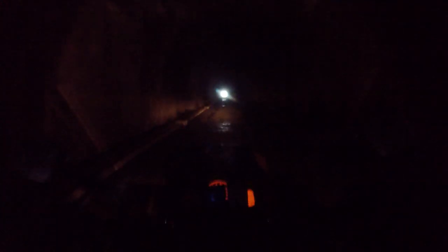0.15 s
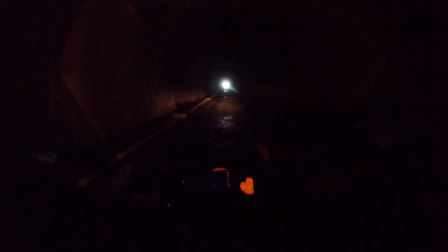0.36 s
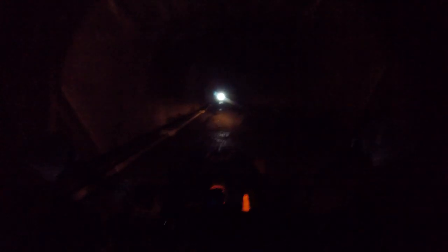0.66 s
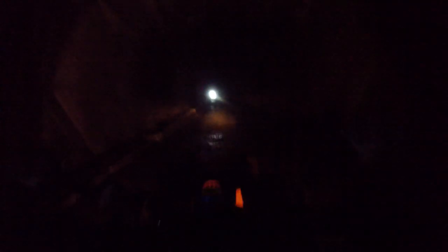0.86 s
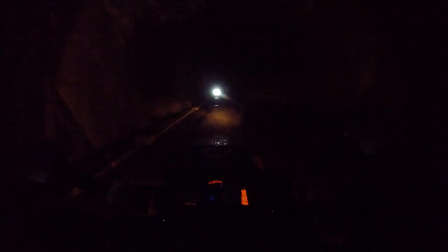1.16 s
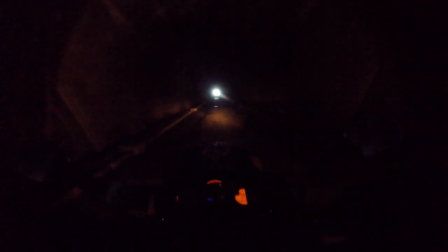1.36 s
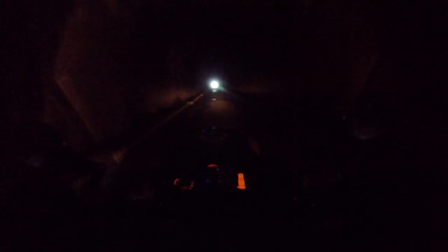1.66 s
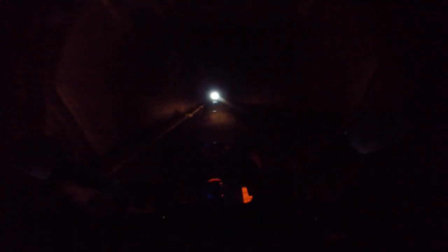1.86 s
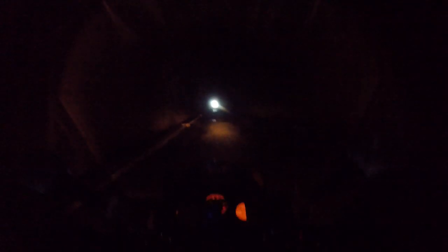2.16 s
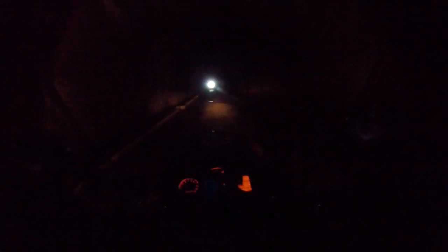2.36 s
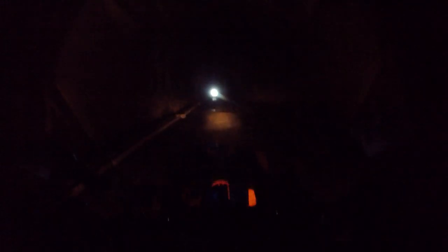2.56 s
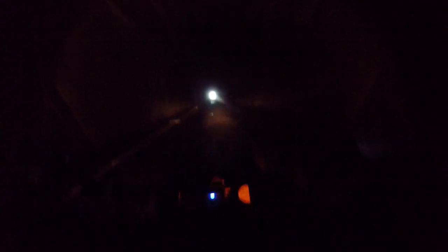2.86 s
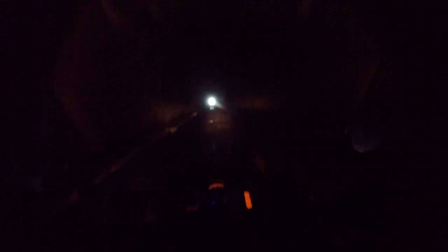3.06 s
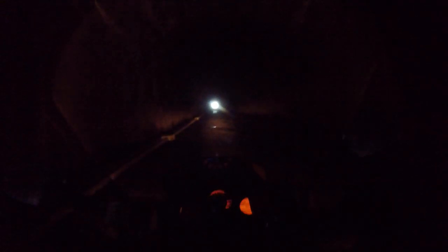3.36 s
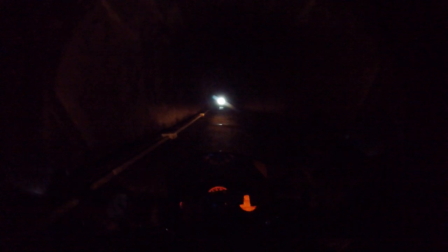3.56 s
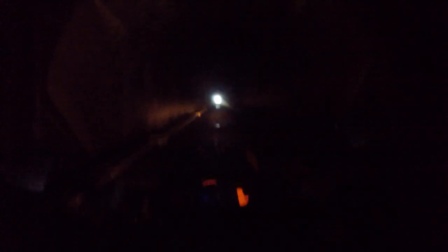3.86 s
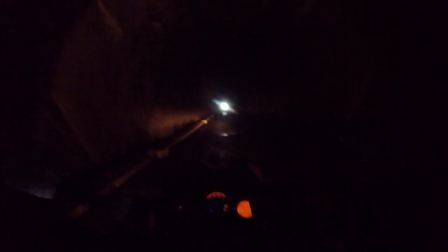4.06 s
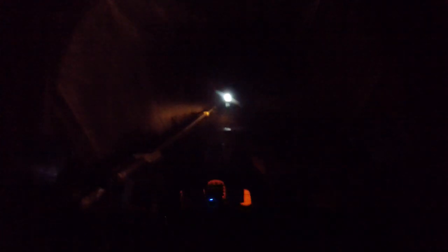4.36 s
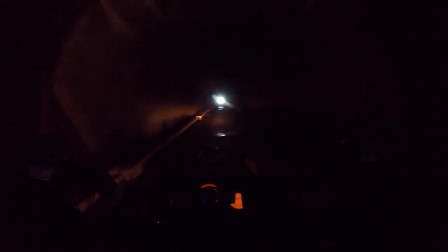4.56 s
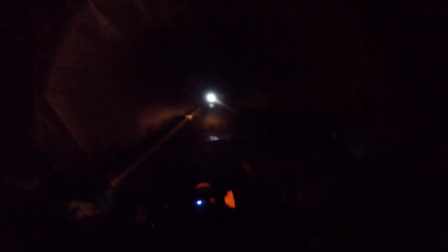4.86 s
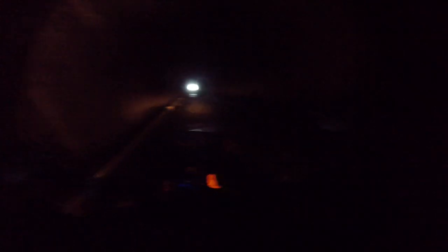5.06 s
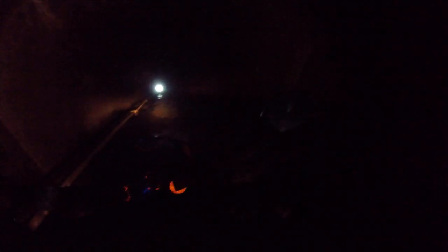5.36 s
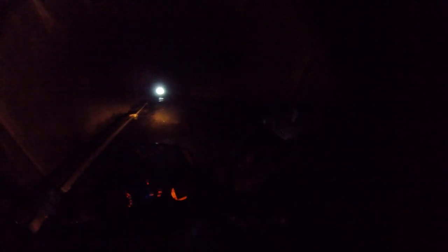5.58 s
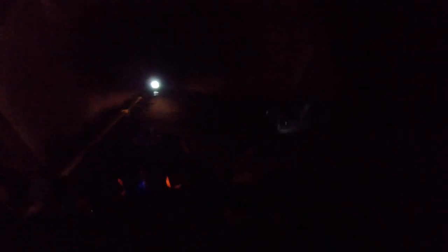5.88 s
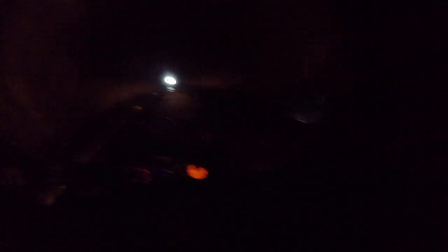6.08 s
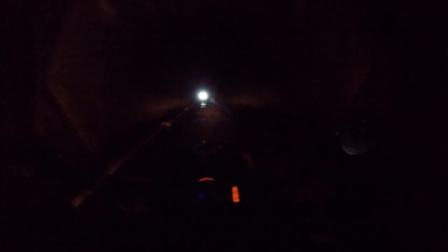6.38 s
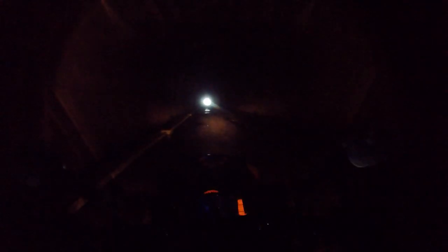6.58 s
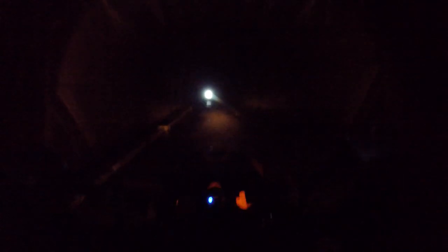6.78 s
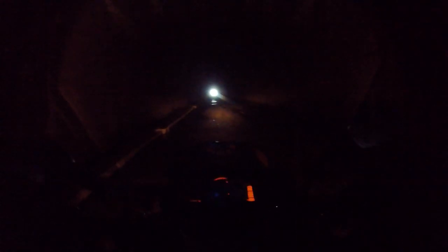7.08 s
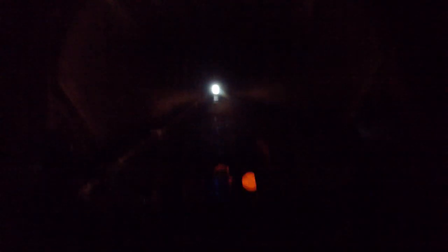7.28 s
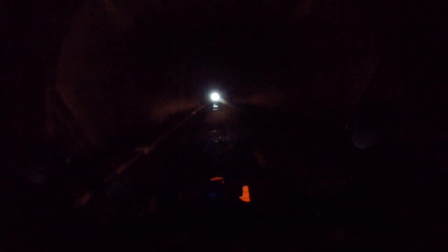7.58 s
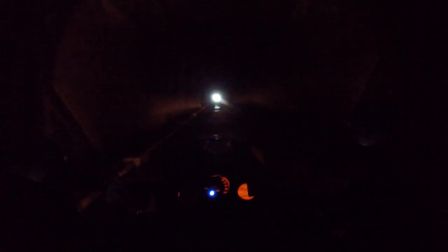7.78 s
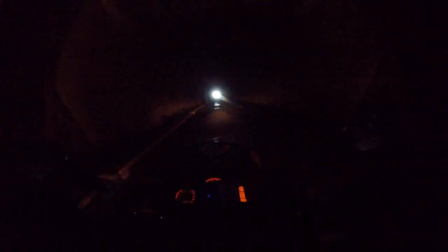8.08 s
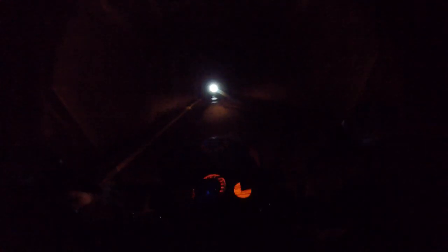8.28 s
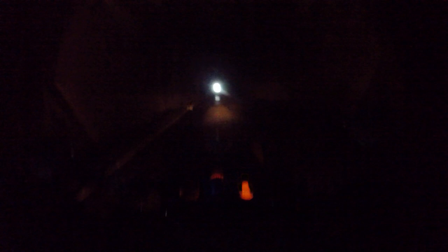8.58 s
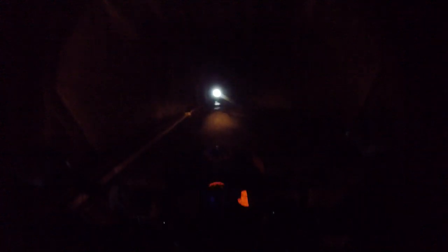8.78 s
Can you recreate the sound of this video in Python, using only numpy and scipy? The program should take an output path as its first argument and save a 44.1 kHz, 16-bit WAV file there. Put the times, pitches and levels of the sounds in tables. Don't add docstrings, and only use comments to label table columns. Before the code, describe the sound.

Lumpy low wind thuds over a washed-out motorbike drone and wet tyre hiss in a tunnel, then one short harsh horn honk echoes away.

```python
import sys
import numpy as np
from scipy import signal
from scipy.fft import rfft, irfft
from scipy.io import wavfile
from scipy.ndimage import uniform_filter1d

SR = 44100
rng = np.random.default_rng(int(sys.argv[2]) if len(sys.argv) > 2 else 0)


def pcm_store(signal):
    levels = np.round(np.clip(np.atleast_2d(signal), -1, 1) * 32767)
    wavfile.write(sys.argv[1], SR, levels.astype(np.int16).T)


def gain_from_db(level_db):
    decades = np.asarray(level_db, float) / 20
    return 10 ** decades


N = 393813
T = np.arange(N) / SR

# t/s, level/dB
AIRFLOW = [(0, -30.5), (.7, -31), (1.4, -32.5), (2.1, -30.5), (2.7, -31.5), (3.5, -30.5), (4.4, -31.5),
           (5.2, -30.5), (5.9, -32.5), (6.6, -31.5), (7.3, -32.5), (7.7, -31), (8.3, -32), (8.93, -33)]
# f/Hz, level/dB per Hz
WIND_COLOUR = [(8.8, -58), (15, -2.5), (49, 2.5), (101, 0.5), (124, -1.5), (226, -19), (500, -28.5),
               (650, -53), (1100, -120)]
# t/s, peak level/dB, f/Hz
THUMPS = [(.018, -25, 68.4), (.165, -16, 78.6), (.394, -18, 87), (.507, -14.5, 97), (.618, -15, 87),
          (.699, -6, 111), (.831, -17.5, 96), (1.127, -13, 69), (1.202, -18, 119), (1.677, -17, 95),
          (1.948, -12.5, 70), (2.166, -13.5, 68), (4.25, -18, 100), (1.45, -17, 100), (2.818, -16.5, 87),
          (3.117, -13, 70), (3.165, -13, 88), (3.648, -22, 98), (4.8, -23, 95), (4.948, -17.5, 78),
          (5.152, -16, 89.5), (6.244, -14.5, 87), (6.483, -14, 97), (6.771, -20, 105), (6.98, -15, 96),
          (7.086, -11.5, 119), (7.882, -17.5, 109), (8.022, -21, 89), (8.64, -15, 107), (8.778, -16, 108)]
# t/s, peak level/dB, f/Hz
SLAPS = [(.012, -17, 227), (.031, -18, 185), (0.644, -21, 269), (0.695, -15.5, 470), (.718, -11.5, 168),
         (.838, -16, 206), (1.038, -24, 353), (1.083, -16.5, 166), (1.994, -17, 147), (2.014, -17.5, 165),
         (2.812, -21, 480), (2.617, -19, 197), (3.156, -14, 163), (3.912, -14, 155), (3.936, -18.5, 149),
         (4.238, -25, 394), (4.659, -17.5, 225), (4.697, -11.5, 142), (5.296, -17.5, 223),
         (5.494, -16.5, 135), (5.537, -13, 133), (5.7, -24, 290), (5.99, -17, 133), (6.124, -15.5, 148),
         (6.358, -18, 146), (6.673, -10, 230), (6.681, -18, 605), (6.911, -18.5, 134), (7.75, -17, 166),
         (7.973, -14, 197)]
# f/Hz, level/dB per Hz
HISS_COLOUR = [(1760, -9), (3000, -13.5), (4330, -22), (5770, -5), (6480, 0), (7320, -12.5), (8990, -18.5),
               (10100, -24.5), (10900, -28), (12900, -34), (13900, -41)]
# t/s, level/dB
WETNESS = [(0, -52), (.4, -47.5), (.65, -46.5), (.97, -48), (1.4, -49.5), (1.85, -47), (2.5, -51),
           (2.95, -50), (3.15, -48.5), (3.75, -46), (4.1, -48.5), (4.7, -48.5), (5.1, -50), (5.6, -51),
           (6.8, -51), (7.55, -50)]
# t/s, rise of the hiss/dB
SPLASHES = [(.53, -0.5), (.97, 4), (1.51, 3), (1.76, 2.5), (2.27, 1.5), (2.48, 3.5), (3.09, 3), (3.26, 3.5),
            (4.73, 5)]
# f/Hz, level/dB per Hz
DRONE_COLOUR = [(88, -23), (150, -4), (242, -8), (586, -13), (700, -10.5), (844, -20), (1040, -18),
                (1590, -25), (2290, -26), (3110, -32), (4300, -42.5), (5590, -76), (9460, -120)]
# t/s, f/Hz, level/dB
BOOM = [
    (4.15, 45.5, -38),
    (4.3, 45.4, -31),
    (4.7, 45.4, -27),
    (5.0, 44.8, -35),
    (5.3, 44.9, -29.5),
    (5.55, 45.6, -60),
]
# t/s, half length/s, rise/dB
SHUDDER = (7.85, 0.13, 3)
# t/s, peak level/dB, f/Hz, spread/octaves
RATTLES = [(3.232, -33.5, 2620, .12), (4.73, -44, 1000, .5), (7.138, -31, 1000, 0.55),
           (7.17, -37, 1110, .5), (7.408, -29, 1200, 0.33), (7.78, -33, 1150, .3), (7.829, -25, 1150, 0.39),
           (7.876, -29, 1150, .35), (7.931, -31, 998.5, .35)]
# t/s, f/Hz, swing level/dB, level of the blows on its stop/dB
HONK = [
    (7.585, 299, -54, -40),
    (7.593, 311, -20, -22),
    (7.599, 315.7, -20, -1),
    (7.608, 325.5, -18.5, 1),
    (7.624, 327.3, -18.5, -0.5),
    (7.703, 329.3, -18.5, 0),
    (7.711, 319, -29, -22),
    (7.73, 289, -23, -50),
    (7.76, 280, -51, -60),
]
# multiple of the pitch, level/dB
OVERTONES = [(1, 0), (2, -16.5), (3, -25), (4, -29), (5, -24), (6, -19.5), (7, -6), (8, -6), (9, -2.5),
             (10, -7.5), (11, -18.5), (12, -26), (13, -30), (14, -26), (15, -30), (16, -27), (17, -24),
             (18, -12), (19, -15), (20, -9.5), (21, -14), (22, -16), (23, -21), (24, -17.5), (25, -22),
             (26, -20), (27, -29), (28, -25), (29, -37), (30, -26), (31, -24.5), (32, -27), (33, -29),
             (34, -30.5), (35, -44), (36, -38)]
# f/Hz, level/dB, t60/s
DISC = (3160, -19, .07)
# f/Hz, t60/s
TUNNEL_T60 = [(300, 3.8), (1000, 1.6), (3000, 1.73), (6000, 1.07), (10000, 0.63)]
# f/Hz, level/dB
ECHO_COLOUR = [(300, -16.5), (1000, -3), (2300, -12.5), (2700, -1), (3300, -2), (3700, -6), (4500, -7),
               (5500, 6.5), (7000, 1.5), (11000, 1)]
# pitch factor, level/dB, share of the tunnel's t60
ECHOES = [
    (1.015, -5.5, 0.71),
    (1.011, -9, 0.92),
    (1.003, -11.5, 1.2),
    (.996, -10, 1.15),
]
# f/Hz, level/dB
GATE = [(3500, -60), (3900, -4), (4700, -3), (5200, -60), (8800, -60), (9400, .4), (13300, .8),
        (14000, 1.5)]

EDGE_HZ, EDGE_DB = 287, -10
SPLIT_HZ, SLOW_FOLLOW, SLOW_DB = 68, 0.53, 1
GUST_S, GUST_DB, WAKE_S = 0.038, 5, 0.0098
SPLASH_S = 0.014
DRONE_DB, DRONE_WAVER_DB = -40, 0.62
NARROWS_S, NARROW_HZ = 7.58, 11900


def evened(x):
    return x / np.sqrt(np.mean(x ** 2) + 1e-20)


def read(points, hz):
    f, value = np.transpose(points)
    return np.interp(np.log(hz + 1), np.log(f + 1), value)


def column(rows, index):
    rows = np.array(rows)
    return np.interp(T, rows[:, 0], rows[:, index])


def add(mix, s, sound):
    part = mix[max(round(s * SR), 0):][:len(sound)]
    part += sound[:len(part)]


def coloured(x, spectrum):
    return irfft(rfft(x) * gain_from_db(read(spectrum, np.fft.rfftfreq(len(x), 1 / SR))), len(x))


def filtered(x, order, hz, kind):
    return signal.sosfilt(signal.butter(order, hz, kind, fs=SR, output="sos"), x)


def drift(hz):
    return evened(filtered(rng.standard_normal(N), 2, hz, "low"))


def bell(s, width):
    return np.exp(-np.minimum(((T[::64] - s) / width) ** 2, 50))


def textured(spectrum, patchy_db, flicker_db):
    frames = N // 128 + 5
    a, b, patches = rng.standard_normal((frames, 257, 3)).T
    patches = uniform_filter1d(patches, size=7, axis=0)
    patches = evened(uniform_filter1d(patches, size=24, axis=1))
    flicker = evened(uniform_filter1d(rng.standard_normal(frames), size=14))
    z = (a + 1j * b) * gain_from_db(patchy_db * patches + flicker_db * flicker)
    noise = signal.istft(z, nperseg=512, noverlap=384)[1][:N]
    return evened(coloured(noise, spectrum))


def eddy(hz, lean):
    u = np.arange(-1.5, 1.5, hz / SR)
    hump = np.exp(-(u / 0.56) ** 2)
    lump = hump * np.cos(2 * np.pi * u + lean)
    return lump - hump * lump.sum() / hump.sum()


def crowd(per_s, spread_db):
    size = gain_from_db(spread_db * np.minimum(rng.exponential(1, N), 4.5))
    small = size * rng.choice([-1, 1], N) * (rng.random(N) < per_s / SR)
    return evened(coloured(small * gain_from_db(1.24 * drift(hz=7.3)), WIND_COLOUR))


def wind():
    strong = THUMPS + SLAPS
    wakes = sum(gain_from_db(db + GUST_DB) * bell(s + WAKE_S, GUST_S) for s, db, _ in strong)
    gusts = np.interp(T, T[::64], 1 + wakes)
    high = signal.butter(1, SPLIT_HZ, "high", fs=SR, output="sos")
    low = signal.butter(1, SPLIT_HZ, fs=SR, output="sos")
    quick = signal.sosfiltfilt(high, crowd(per_s=280, spread_db=4.3))
    slow = signal.sosfiltfilt(low, crowd(per_s=400, spread_db=2.5))
    crowds = gusts * quick + gain_from_db(SLOW_DB) * gusts ** SLOW_FOLLOW * slow
    out = gain_from_db(column(AIRFLOW, index=1) + 2.5) * crowds
    for (s, db, hz), (lean, spread) in zip(strong, rng.normal(0, 0.8, (len(strong), 2))):
        add(out, s - 1.524 / hz, gain_from_db(db - 2.0) * eddy(hz, lean))
        edge = max(EDGE_HZ * (1 + 0.39 * spread), 1.96 * hz)
        add(out, s - 1.48 / edge, gain_from_db(db + EDGE_DB - 4.5) * eddy(edge, lean))
    return out


def tyres():
    hiss = textured(HISS_COLOUR, patchy_db=0.88, flicker_db=0.5)
    drops = gain_from_db(4.2 * np.minimum(rng.exponential(1, N), 4)) * (rng.random(N) < 900 / SR)
    puddles = np.interp(T, T[::64], sum(db * bell(s, SPLASH_S) for s, db in SPLASHES))
    spray = evened(hiss + 0.31 * evened(coloured(drops, HISS_COLOUR)))
    return gain_from_db(column(WETNESS, index=1) + puddles + 2.0) * spray


def engine():
    turns = np.cumsum(column(BOOM, index=1) * (1 + 0.005 * drift(hz=4.6))) / SR
    bump_s, half_s, bump_db = SHUDDER
    shake = np.interp(T, T[::64], bump_db * bell(bump_s, half_s))
    firings = 1 + 0.044 * np.cos(2 * np.pi * turns)
    level = gain_from_db(DRONE_DB + DRONE_WAVER_DB * drift(hz=6.4) + shake)
    drone = level * firings * textured(DRONE_COLOUR, patchy_db=1.0, flicker_db=0.72)
    start, end = BOOM[0][0], BOOM[-1][0]
    inside = np.interp(T, [start - .2, start, end, end + .2], [0, 1, 1, 0])
    boom = np.sqrt(2) * inside * gain_from_db(column(BOOM, index=2)) * np.sin(2 * np.pi * turns)
    return drone + boom


def rattles():
    out, t = np.zeros(N), np.arange(1300) / SR
    for s, db, hz, spread in RATTLES:
        knock = gain_from_db(db - 60 * t / 0.041) * (1 - np.exp(-t / .0015)) * rng.standard_normal(len(t))
        band = [hz / 2 ** spread, hz * 2 ** spread]
        add(out, s, 4.2 * filtered(knock, 2, band, "band"))
    return out


def horn(shift):
    on, out = (T > HONK[0][0]) & (T < HONK[-1][0]), np.zeros(N)
    pitch = shift * column(HONK, index=1) * (1 + .002 * drift(hz=90))
    turns = np.cumsum(pitch[on]) / SR
    tones = [gain_from_db(db) * np.cos(2 * np.pi * (k * turns + rng.random())) for k, db in OVERTONES]
    chatter = 1 + 0.37 * drift(hz=260)[on]
    blows = sum(tones[1:15]) + chatter * sum(tones[15:])
    swing_level, blow_level = gain_from_db(column(HONK, index=2)[on]), gain_from_db(column(HONK, index=3)[on])
    out[on] = swing_level * (tones[0] + blow_level * blows)
    hz, db, t60 = DISC
    t = np.arange(SR // 5) / SR
    fade = gain_from_db(db - 60 * t / t60) * (1 - np.exp(-t / 0.0017))
    add(out, HONK[1][0], fade * np.sin(2 * np.pi * shift * hz * t))
    return out


def tunnel(x, linger):
    taps, at = np.zeros(2 * SR), np.arange(500, 2 * SR - 20, 20)
    taps[at + rng.integers(0, 20, len(at))] = rng.choice([-1., 1.], len(at))
    hz, t, z = signal.stft(taps, SR, nperseg=256)
    t60 = linger * read(TUNNEL_T60, hz)[:, None]
    tail = signal.istft(z * gain_from_db(-60 * t / t60), SR, nperseg=256)[1]
    return signal.fftconvolve(x, coloured(tail / np.linalg.norm(tail), ECHO_COLOUR))[:N]


def gated(x):
    hz, _, z = signal.stft(x, SR, nperseg=2048, noverlap=1536)
    power = uniform_filter1d(abs(z) ** 2, size=5, axis=-1)
    limit = uniform_filter1d(power, size=45, axis=-2) * gain_from_db(2 * read(GATE, hz))[:, None]
    weak_group = uniform_filter1d(power, size=7, axis=-2) < .72 * limit
    shut = (power < .7 * limit) | weak_group
    return signal.istft(z * np.where(shut, .03, 1), SR, nperseg=2048, noverlap=1536)[1][:, :N]


def scene():
    echoes = sum(gain_from_db(db) * tunnel(horn(shift), linger) for shift, db, linger in ECHOES)
    return (wind() + tyres() + engine() + rattles() + horn(1) + echoes)[None]


def top_cut(x):
    return signal.sosfilt(signal.butter(12, 14060, fs=SR, output="sos"), x)


def record(dry):
    lowpass = signal.firwin(255, NARROW_HZ, window=("kaiser", 7), fs=SR)
    narrow = signal.oaconvolve(dry, lowpass[None], "same")
    mix = gated(np.where(T < NARROWS_S, dry, narrow))
    return top_cut(mix)


dry = scene()
out = record(dry)
pcm_store(out)
```